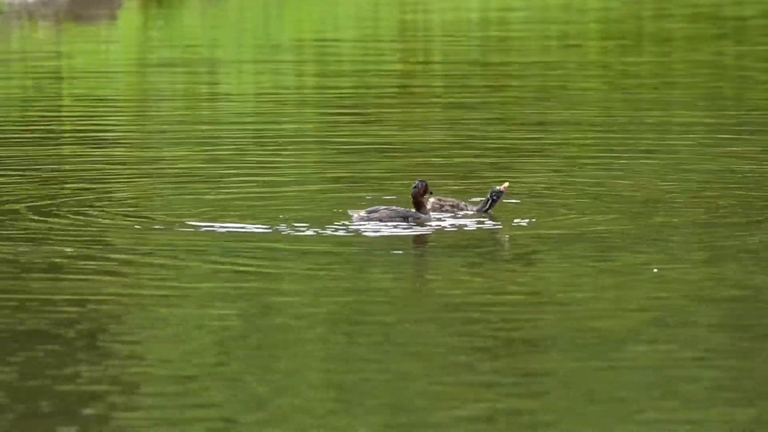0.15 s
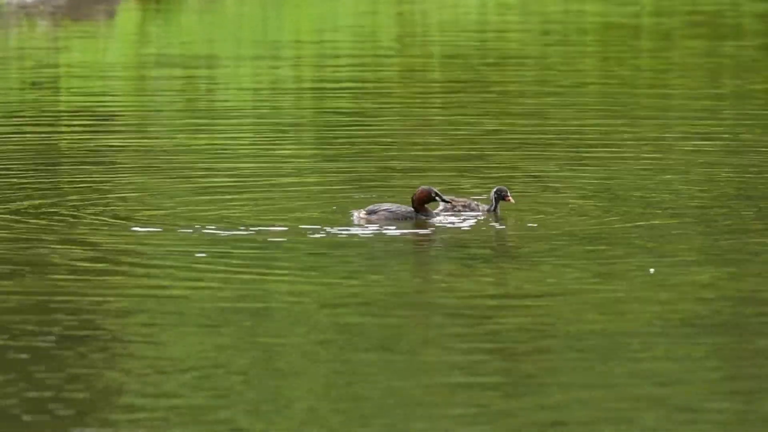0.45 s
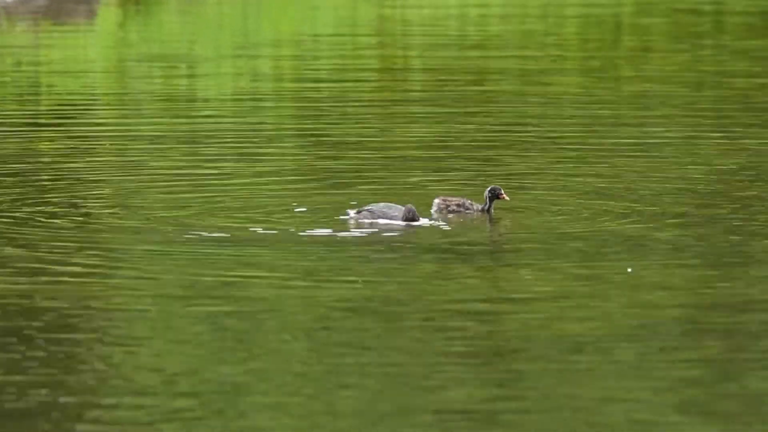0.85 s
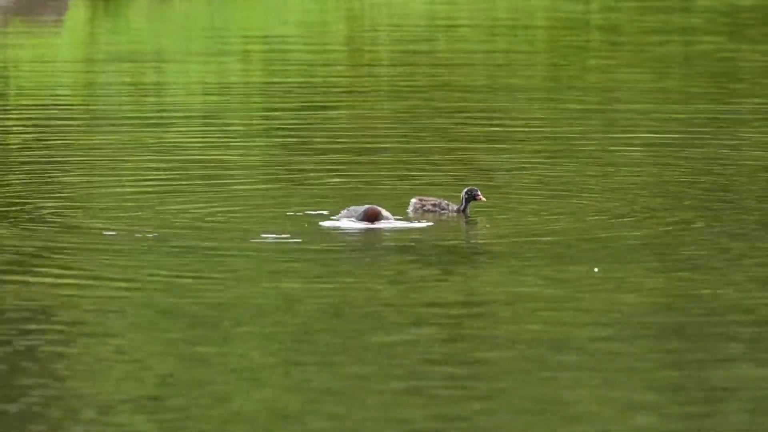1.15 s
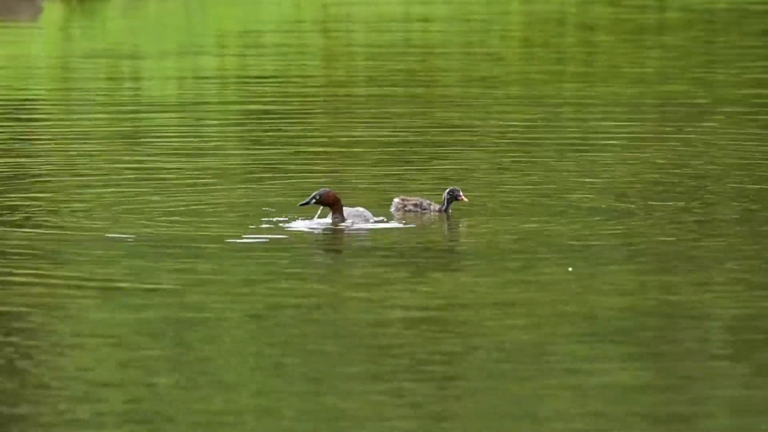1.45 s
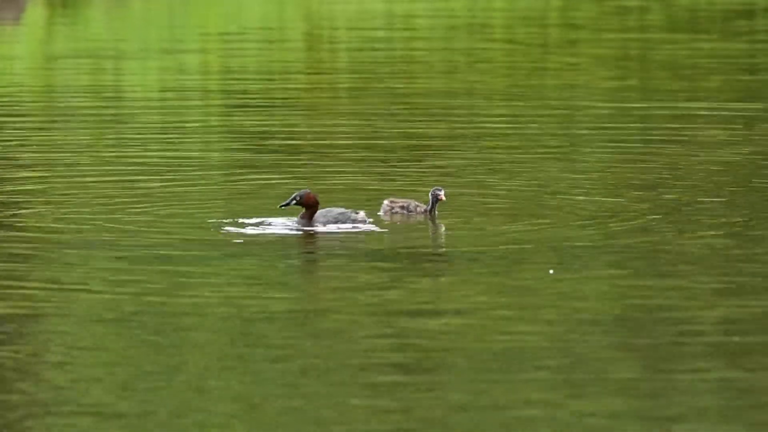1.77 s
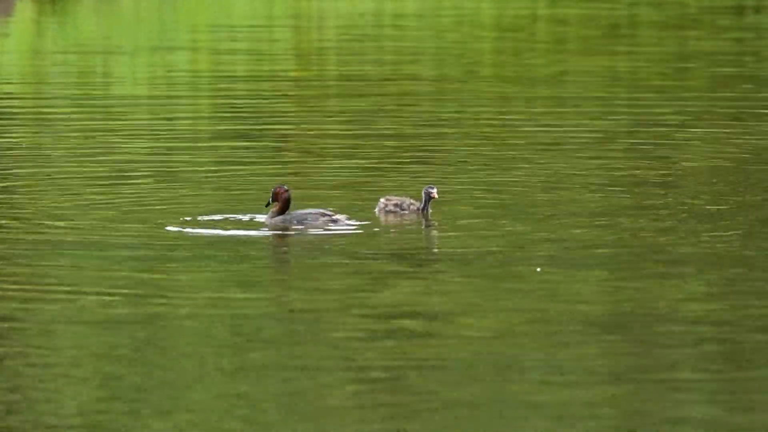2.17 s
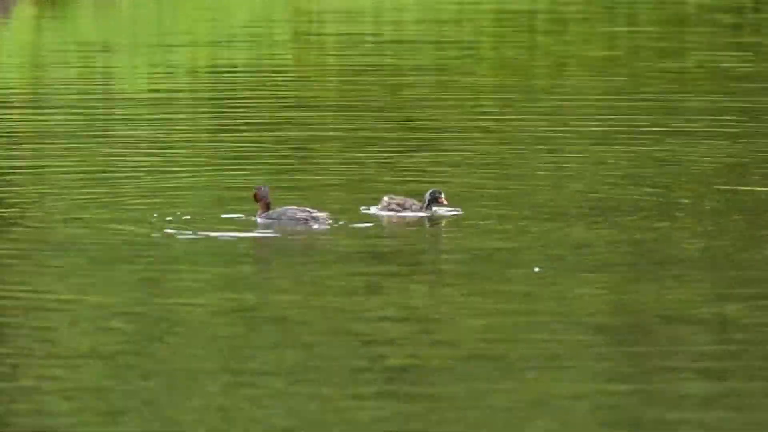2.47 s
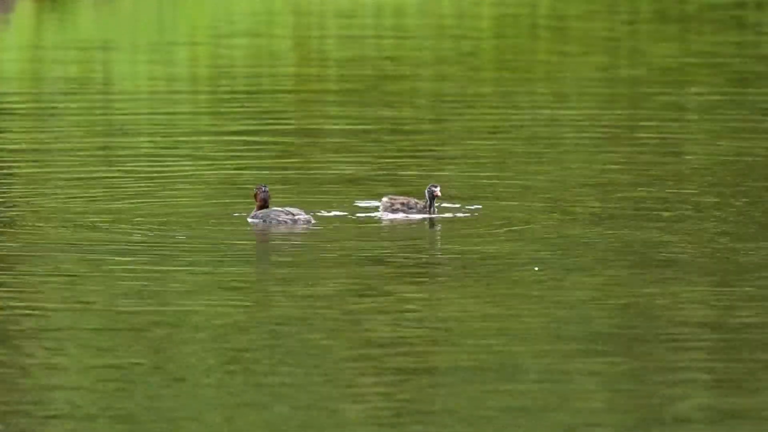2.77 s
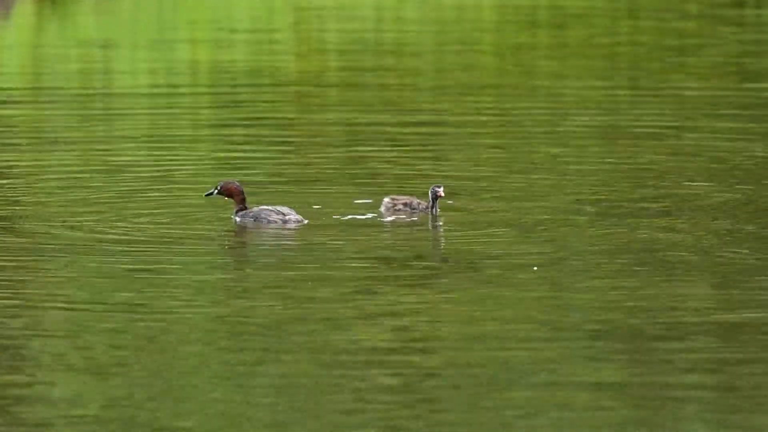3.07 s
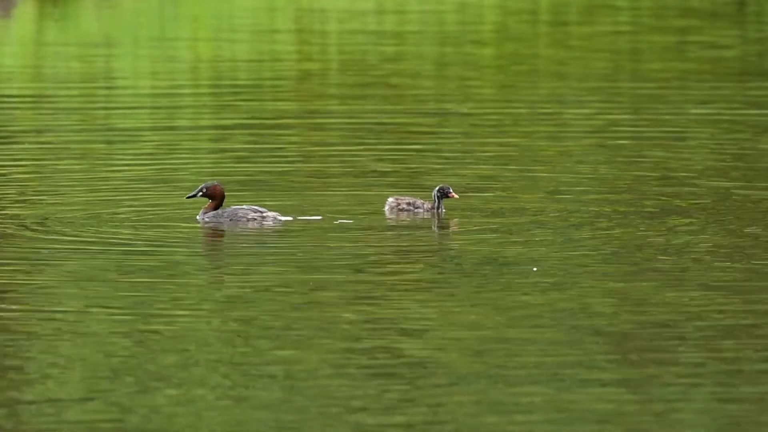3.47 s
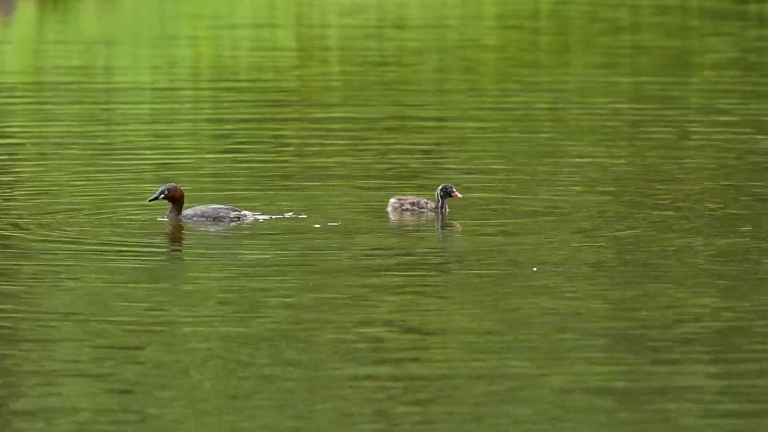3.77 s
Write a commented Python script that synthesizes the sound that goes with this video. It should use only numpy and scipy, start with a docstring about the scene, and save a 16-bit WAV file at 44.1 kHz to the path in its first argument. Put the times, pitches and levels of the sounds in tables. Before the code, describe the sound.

A near cicada buzzes in rapid throbs within a wide, bright cicada chorus. A far crow caws faintly near the start and end; a water bird splashes lightly mid-way. Open pondside, stereo microphone.

```python
"""A near cicada clicks and throbs beside a pond: alternating impulses ring damped body modes.
A wide chorus fuses into two bright bands: flickering filtered noise and a few narrow resonances.
Filtered noise makes a low murmur of air and distance; a far crow caws by harmonics of a gliding pitch.
Decaying sines make a faint rattle; a water bird splashes as bursts of noise ring short resonances.
The bass is heard in mono, two narrow treble notches are filtered out in editing, and the top is cut."""
import sys
import numpy as np
from scipy import signal
from scipy.fft import rfft, irfft
from scipy.io import wavfile

SR = 44100
rng = np.random.default_rng(int(sys.argv[2]) if len(sys.argv) > 2 else 0)


def dump_mix(stems):
    """Bounce the given channels to the path in sys.argv[1] as a 16-bit WAV at rate SR."""
    frames = np.atleast_2d(stems).T  # one column per channel
    limited = np.clip(frames, -1, 1)  # hard clip at full scale
    pcm = np.round(limited * 32767).astype(np.int16)
    wavfile.write(sys.argv[1], SR, pcm)


N = 172872
T = np.arange(N) / SR


def from_db(db):
    """Level law: twenty decibels are a factor of ten in amplitude."""
    return 10 ** (np.asarray(db) / 20)


def rms_one(x):
    """Normalization: scales a signal to unit root mean square."""
    return x / np.sqrt(np.mean(x ** 2) + 1e-20)


def in_time(rows):
    """Linear interpolation: turns rows that begin with t/s into one curve per further column."""
    s, *columns = np.transpose(rows)
    return [np.interp(T, s, column) for column in columns]


def at_hz(points, hz):
    """Spectral envelope: interpolates levels along logarithmic frequency."""
    point_hz, point_db = np.array(points).T
    return np.interp(np.log(hz + 1), np.log(point_hz), point_db)


def pan(x, db):
    """Interaural level difference: raises the left by half of it and lowers the right by half."""
    return x * from_db([[db / 2], [-db / 2]])


def drift(rate_hz):
    """Low-pass random process: two equal poles leave slow chance with spread 1."""
    step = 40  # samples between computed points
    pole = np.exp(-2 * np.pi * rate_hz * step / SR)
    noise = rng.standard_normal(N // step + 2002)
    slow = signal.lfilter([1], [1, -2 * pole, pole * pole], noise)[2000:]  # past the build-up
    return np.interp(np.arange(N) / step, np.arange(len(slow)), rms_one(slow))


def resonance(x, hz, width_hz):
    """Damped oscillator: a pole pair whose radius sets the bandwidth."""
    radius = np.exp(-np.pi * width_hz / SR)
    poles = [1, -2 * radius * np.cos(2 * np.pi * hz / SR), radius * radius]
    return signal.lfilter([1, 0, -1], poles, x + 1e-18)


LEAVES_T60_S = .12


def scatter(x, level_db):
    """Multiple scattering: adds dense decaying echoes from leaves, independent on each side."""
    age = T[:SR // 5]
    leaves = rng.standard_normal((2, len(age))) * from_db(-60 * age / LEAVES_T60_S)
    leaves = leaves / np.sqrt(np.sum(leaves ** 2, axis=1, keepdims=True))
    # the doubled signal lets the end's echoes reach the beginning
    echoes = signal.fftconvolve(np.tile(x, 2), leaves, axes=1)[:, N:2 * N]
    return (x + from_db(level_db) * echoes) / np.sqrt(1 + from_db(2 * level_db))


# left-right balance of the noise along the spectrum: f/Hz, left-right difference/dB
NOISE_BALANCE = [(700, 0.5), (1300, -1.5), (2300, -5), (3300, -0.5), (4500, -6.5), (5700, -5.5), (7300, -2),
                 (9200, 0.5), (11700, 4), (14900, -0.5)]
FLICKER_RATE_HZ = 58


def wide_noise(mid_spectrum, side_spectrum, side_db, flicker_db):
    """Mid-side superposition: independent front and side noise; front rms 1 before balance and flicker."""
    hz = np.fft.rfftfreq(N, 1 / SR)
    parts = []
    for spectrum in (mid_spectrum, side_spectrum):
        part = rfft(rng.standard_normal(N)) * from_db(at_hz(spectrum, hz))
        parts.append(part / np.sqrt(np.mean(irfft(part, N) ** 2)))
    mid, side = parts
    side = side * from_db(side_db)
    balance = from_db(np.outer([.5, -.5], at_hz(NOISE_BALANCE, hz)))
    ears = np.array([mid + side, mid - side]) * balance
    if not flicker_db:
        return irfft(ears, N)
    # third-octave patches flicker independently; the lowest and highest are open-ended
    patch = np.clip(np.round(3 * np.log2((hz + 1) / 3500)), 0, 7)
    out = np.zeros((2, N))
    for k in range(8):
        flicker = [flicker_db * drift(FLICKER_RATE_HZ) for _ in range(2)]
        out += irfft(ears * (patch == k), N) * from_db(flicker)
    return out


# lead of the near cicada over a steady beat: t/s, clicks ahead (count), throbs ahead (count)
BEAT_LEAD = [(0.0, 0.24, -0.46), (0.28, 0.15, -0.54), (0.56, 0.05, -0.59), (0.84, -0.02, -0.65),
             (1.12, -0.03, -0.66), (1.4, -0.02, -0.67), (1.68, -0.02, -0.68), (1.96, 0.01, -0.64),
             (2.24, 0.06, -0.58), (2.52, 0.12, -0.55), (2.8, 0.21, -0.51), (3.08, 0.24, -0.41),
             (3.36, 0.31, -0.43), (3.64, 0.56, -0.42), (3.92, 0.66, -0.5)]
# damped modes of its body: f/Hz, greatest level/dB, ring T60/s,
# loudest moment in the throb (0-1), swell depth/dB, left-right difference/dB
BODY_MODES = [(4880, -33, .02, .55, 8, 0), (5262, -20.5, .024, .38, 40, -1), (5610, -24, .02, .52, 40, 5),
              (5960, -29, .02, .72, 10, -6), (14400, -26, .0045, .97, 24, -3)]
CLICKS_PER_S, THROBS_PER_S = 363.5, 16.5
CLICK_JITTER_S, CLICK_UNEVEN_DB, CLICK_RISE_S = .000012, 1.0, .00025
PITCH_SCATTER = .003  # relative spread of mode frequency from click to click
SWEEP_LOW_HZ, SWEEP_HIGH_HZ = 10900, 13000
SWEEP_LOWEST_AT, SWEEP_DWELL = .37, 1.4  # throb phase (0-1), flattening at the top of the glide
SWEEP_DB, SWEEP_T60_S, SWEEP_PAN_DB = -26.5, .007, -4
CICADA_LOW_CUT_HZ, CICADA_LEAVES_DB = 4200, -9


def near_cicada():
    """Modal excitation: two drums click in turn with opposite sign; the throb shifts strength and pitch."""
    s, clicks_ahead, throbs_ahead = np.transpose(BEAT_LEAD)
    count = np.arange(-6, int(CLICKS_PER_S * T[-1]) + 2)
    lead = np.interp(count / CLICKS_PER_S, s, clicks_ahead)
    jitter = CLICK_JITTER_S * rng.standard_normal(len(count))
    click_s = np.sort((count - lead) / CLICKS_PER_S + jitter)
    throb = THROBS_PER_S * click_s + np.interp(click_s, s, throbs_ahead)

    modes = []
    for hz, db, t60, loudest_at, swell_db, pan_db in BODY_MODES:
        swell = swell_db * np.sin(np.pi * (throb - loudest_at)) ** 2
        modes.append((hz, db - swell, t60, pan_db))
    glide = np.clip(SWEEP_DWELL * np.sin(np.pi * (throb - SWEEP_LOWEST_AT)) ** 2, 0, 1)
    sweep_hz = SWEEP_LOW_HZ + (SWEEP_HIGH_HZ - SWEEP_LOW_HZ) * glide
    modes.append((sweep_hz, SWEEP_DB, SWEEP_T60_S, SWEEP_PAN_DB))

    last_click = np.clip(np.searchsorted(click_s, T) - 1, 5, len(click_s) - 1)
    out = np.zeros((2, N))
    for hz, db, t60, pan_db in modes:
        hz = hz * (1 + PITCH_SCATTER * rng.standard_normal(len(click_s)))
        db = db + CLICK_UNEVEN_DB * rng.standard_normal(len(click_s))
        for k in last_click - np.arange(6)[:, None]:  # the six latest clicks overlap
            age = np.maximum(T - click_s[k], 0)
            decay = from_db(db[k] - 60 * age / t60)
            rise = 1 - np.exp(-age / CLICK_RISE_S)
            ring = np.sin(2 * np.pi * hz[k] * age)
            out += pan((-1.) ** k * decay * rise * ring, pan_db)
    low_cut = signal.butter(8, CICADA_LOW_CUT_HZ, "high", fs=SR, output="sos")
    return scatter(signal.sosfilt(low_cut, out), CICADA_LEAVES_DB)


# level of the crowd noise: t/s, level/dB
CROWD_LEVEL = [(0.02, -21.5), (0.06, -21.5), (2.62, -20.5), (3.9, -21)]
# crowd spectra, straight ahead and from the sides: f/Hz, relative level per Hz/dB
CROWD_MID = [(1760, -64), (3000, -56), (3760, -31.5), (4140, -18), (4580, -13.5), (4700, -8.5), (5180, -3),
             (5700, -3.5), (6490, -0.5), (7090, -4), (7540, -10), (8190, 2.5), (8640, 2), (9190, -4.5),
             (9840, -13.5), (10400, -12.5), (11500, -21.5), (14500, -28), (15300, -21.5)]
CROWD_SIDE = [(1760, -64), (3000, -43), (3300, -40), (3760, -29), (4840, -11.5), (5740, -3), (6670, -0.5),
              (7590, -7), (8130, -8), (8590, 1.5), (9130, -5), (9710, -15), (10400, -15), (11500, -15.5),
              (14400, -22), (15300, -28)]
# singers that stand out: f/Hz, resonance width/Hz, mean level/dB, clicks per s/Hz, left-right difference/dB
SOLO_SINGERS = [(4824, 22, -39.5, 450, -6), (4990, 17.7, -38.5, 490, 5), (5880, 32, -41.5, 620, -18),
                (6410, 270, -42.5, 130, -8), (8555, 200, -32.5, 484, -2.5), (8254, 96, -39, 280, -8),
                (9000, 230, -37.5, 450, 11)]
SINGER_GATE_DB, CHORUS_LEAVES_DB = 3, -10


def chorus():
    """Incoherent superposition: crowd noise, and resonated noise gated at each singer's click rate."""
    level_db, = in_time(CROWD_LEVEL)
    out = from_db(level_db) * wide_noise(CROWD_MID, CROWD_SIDE, side_db=0, flicker_db=.33)
    for hz, width_hz, db, rate_hz, pan_db in SOLO_SINGERS:
        tone = resonance(rng.standard_normal((2, N)), hz, width_hz)
        tone = resonance(tone, hz, 2 * width_hz)
        clicks = np.cumsum(rate_hz * (1 + 0.0029 * drift(2.8))) / SR
        gate_db = SINGER_GATE_DB * np.cos(2 * np.pi * clicks)
        level = from_db(db + 0.98 * drift(1.7))
        out = out + pan(level * rms_one(tone * from_db(gate_db)), pan_db)
    return scatter(out, CHORUS_LEAVES_DB)


# murmur spectra, straight ahead and from the sides: f/Hz, relative level per Hz/dB
MURMUR_MID = [(15, -31), (25, -10.5), (50, -7.5), (65, -1), (110, 0.5), (200, -3), (400, -6.5), (800, -7),
              (1500, -9), (2200, -7.5), (3000, -9.5), (3500, -10), (4500, -24)]
MURMUR_SIDE = [(180, -92), (300, -62), (526, -57), (634, -14), (741, -20), (1060, -6), (2690, -2),
               (3280, -1), (3600, -2), (4680, -30), (7920, -120)]
MURMUR_MID_DB, MURMUR_SIDE_DB = -51, -56


def air():
    """Broadband noise: spectral envelopes shape the low murmur of air and distance."""
    side_db = MURMUR_SIDE_DB - MURMUR_MID_DB
    return from_db(MURMUR_MID_DB) * wide_noise(MURMUR_MID, MURMUR_SIDE, side_db, flicker_db=1)


# one contour per caw: t/s, pitch f/Hz, relative level/dB, throat resonance f/Hz
CAW_CONTOURS = [
    [(.25, 155, -62, 1200), (.29, 181, -49, 1270), (.37, 182, -47, 1300), (.46, 170.5, -46.5, 1220),
     (.55, 159, -53, 1144), (.61, 148, -54, 1310), (.67, 136.7, -62, 1260)],
    [(1.1, 150, -70, 1080), (1.16, 156.4, -60, 1080), (1.25, 154, -72, 1080)],
    [(2.63, 172, -74, 1380), (2.71, 171, -59, 1380), (2.78, 166, -69, 1330), (2.84, 154.6, -62, 1240),
     (2.89, 147, -74, 1200)],
    [(3.57, 183, -57, 1320), (3.61, 187, -54.5, 1330), (3.7, 194.5, -52, 1350), (3.76, 185.7, -50.5, 1350),
     (3.83, 173.4, -48.5, 1260), (3.88, 166, -53, 1170), (3.93, 150, -56, 1180)],
]
# a single lower tone under the last caw: t/s, f/Hz, relative level/dB
UNDERTONE = [(3.58, 955.9, -54), (3.596, 940, -58), (3.62, 945.8, -49.5), (3.73, 980, -51),
             (3.8, 895.7, -59)]
THROAT_WIDTH_HZ, CAW_UNEVEN_DB, CROW_LEAVES_DB = 384, 2.5, -7
CAW_ROUGH = .0041  # relative spread of pitch


def crow():
    """Source-filter principle: distance leaves only the harmonics near the throat resonance."""
    out = np.zeros(N)
    for caw in CAW_CONTOURS:
        pitch_hz, db, throat_hz = in_time(caw)
        turns = np.cumsum(pitch_hz * (1 + CAW_ROUGH * drift(44.0))) / SR
        on = (T > caw[0][0]) & (T < caw[-1][0])
        for k in range(7, 10):
            detuning = 2 * (k * pitch_hz - throat_hz) / THROAT_WIDTH_HZ
            throat_gain = 1 / (1 + detuning ** 2)
            level = from_db(db + 1.5 + CAW_UNEVEN_DB * drift(13.0))
            out += on * throat_gain * level * np.sin(2 * np.pi * (k * turns + rng.random()))
    hz, db = in_time(UNDERTONE)
    on = (T > UNDERTONE[0][0]) & (T < UNDERTONE[-1][0])
    out += on * from_db(db + 2) * np.sin(2 * np.pi * np.cumsum(hz) / SR)
    return scatter(pan(out, -1.6), CROW_LEAVES_DB)


# a faint quick rattle on one pitch: t/s, initial level/dB
RATTLE = [(1.728, -45), (1.7446, -43), (1.7594, -44), (1.7794, -46)]
TICK_HZ, TICK_T60_S, TICK_PAN_DB = 1910, .04, -11


def ticks():
    """Free decay: each of four faint taps rings one exponentially damped sine."""
    out = np.zeros(N)
    for s, db in RATTLE:
        age = np.maximum(T - s, 0)
        out += from_db(db - 60 * age / TICK_T60_S) * np.sin(2 * np.pi * TICK_HZ * age)
    return pan(out, TICK_PAN_DB)


# splashes: t/s, peak level before panning/dB, left-right difference/dB, bass gain/dB, treble gain/dB
SPLASH_EVENTS = [(2.217, -27, -3, 4, -5), (2.311, -30.5, -12, 5, 4), (2.434, -23.5, -10, -1, 0),
                 (2.453, -23, -15.5, 2, 4.5)]
# short rings of the water: f/Hz, relative level/dB, nominal ring time/s (inverse to the bandwidth)
WATER_RINGS = [(333, -4, 0.067), (520, -6, 0.028), (780, -4, 0.01), (1080, -1, 0.011), (1890, 5, 0.016),
               (2360, 4, .02), (3050, -8.5, 0.015)]
SPRAY_PEAK_S, SPRAY_WIDE_DB = .002, 5  # envelope peak time, gain of the side-independent spray


def splashes():
    """Transient excitation: a short burst of spray sets off the water's damped resonances."""
    out = np.zeros((2, N))
    age = np.maximum(T[:SR // 8], 1e-9)
    envelope = age / (2 * SPRAY_PEAK_S) * np.exp(-age / SPRAY_PEAK_S)
    for s, db, pan_db, bass_db, treble_db in SPLASH_EVENTS:
        spray = rng.standard_normal((2, len(age))) * envelope
        spray = spray[0] + from_db(SPRAY_WIDE_DB) * spray  # a part shared by both sides
        rings = np.zeros_like(spray)
        for hz, level_db, ring_s in WATER_RINGS:
            ring_db = level_db + bass_db * (hz < 1500) + treble_db * (hz > 2100)
            rings += from_db(ring_db) * rms_one(resonance(spray, hz, 2.8 / ring_s))
        i = int(s * SR)
        out[:, i:i + len(age)] += pan(from_db(db) * rings / np.abs(rings).max(), pan_db)
    return out


def scene():
    """Linear superposition: the sound pressures of all sources add."""
    return near_cicada() + chorus() + air() + crow() + ticks() + splashes()


# treble notches made in editing: f/Hz, nominal width/Hz (each of two passes has half of it)
TREBLE_NOTCHES = [(7675, 530), (9615, 630)]
MONO_BELOW_HZ, PASSBAND_EDGE_HZ = 680, 15200


def record(dry):
    """Linear filtering: the bass goes mono, two editing notches follow, then the top is cut."""
    mid, side = (dry[0] + dry[1]) / 2, (dry[0] - dry[1]) / 2
    hz = np.fft.rfftfreq(N, 1 / SR) + 1
    side = irfft(rfft(side) / (1 + (MONO_BELOW_HZ / hz) ** 4), N)
    out = np.array([mid + side, mid - side])
    for notch_hz, width_hz in TREBLE_NOTCHES:
        for _ in range(2):
            b, a = signal.iirnotch(notch_hz, notch_hz / width_hz * 2, fs=SR)
            out = signal.lfilter(b, a, out)
    top_cut = signal.ellip(12, .5, 75, PASSBAND_EDGE_HZ, fs=SR, output="sos")
    return signal.sosfilt(top_cut, out)


dry = scene()
out = record(dry)
dump_mix(out)
```